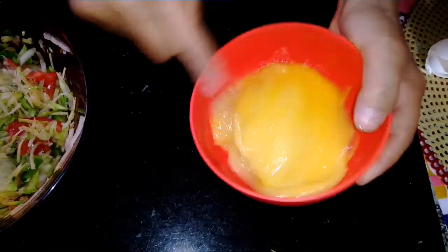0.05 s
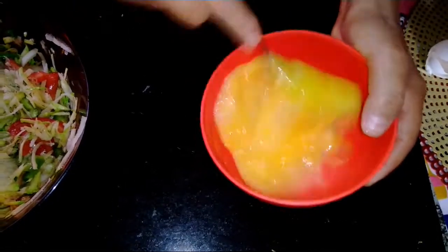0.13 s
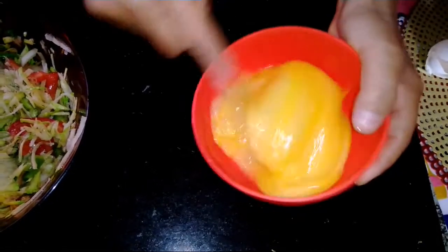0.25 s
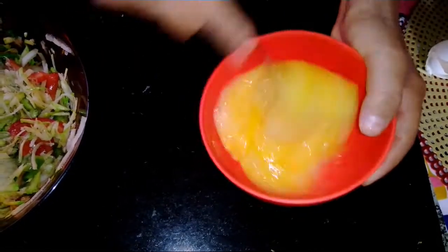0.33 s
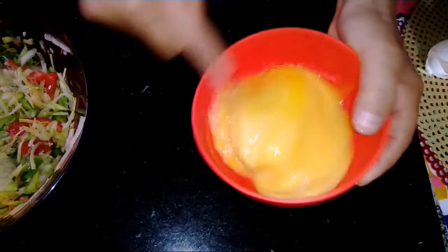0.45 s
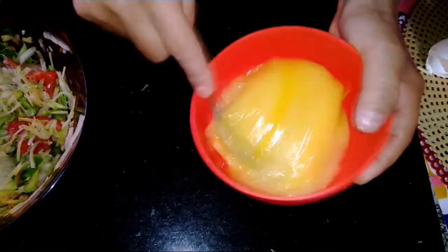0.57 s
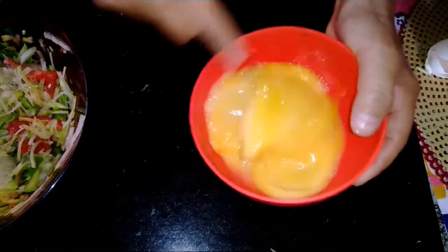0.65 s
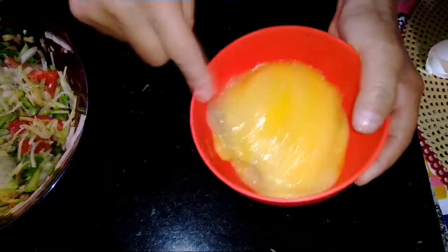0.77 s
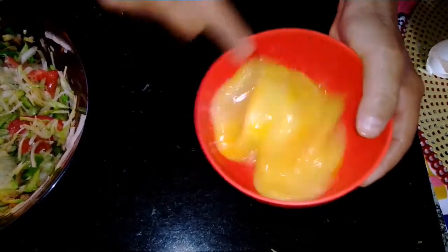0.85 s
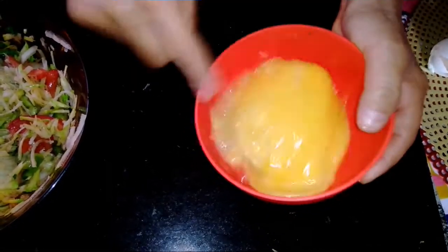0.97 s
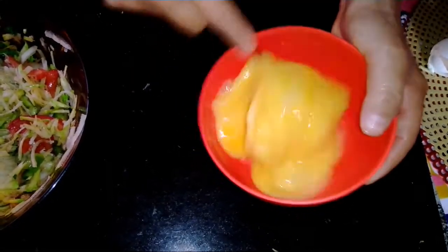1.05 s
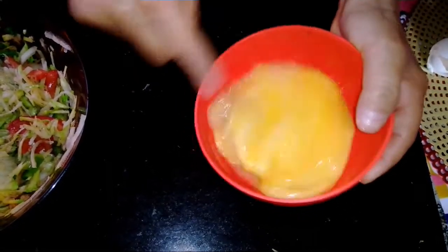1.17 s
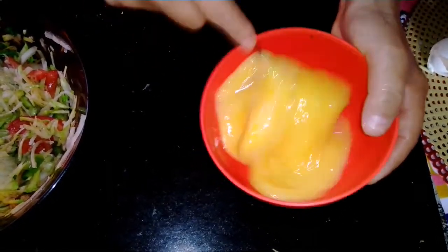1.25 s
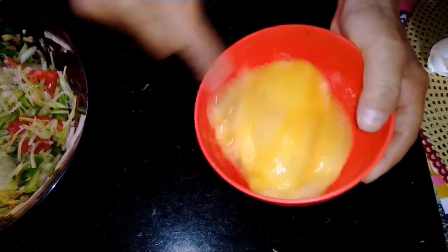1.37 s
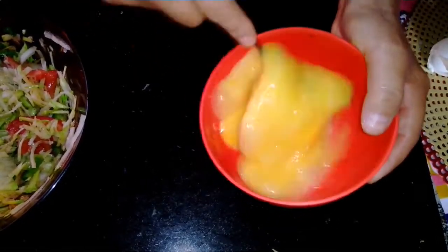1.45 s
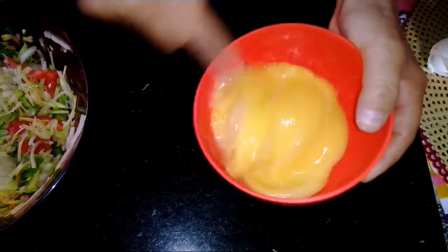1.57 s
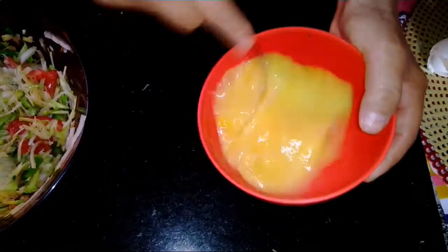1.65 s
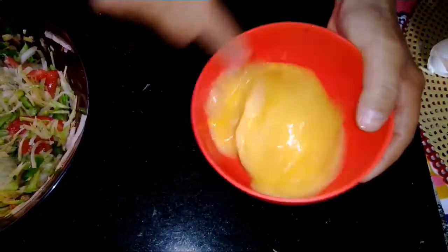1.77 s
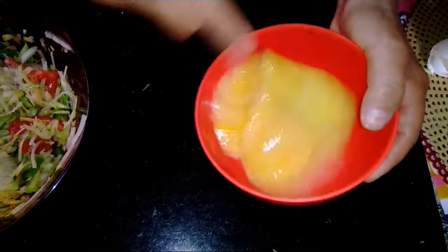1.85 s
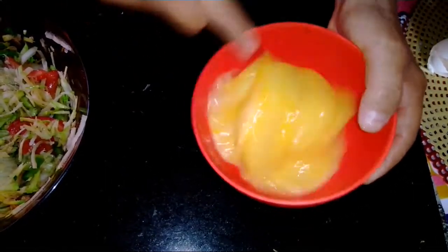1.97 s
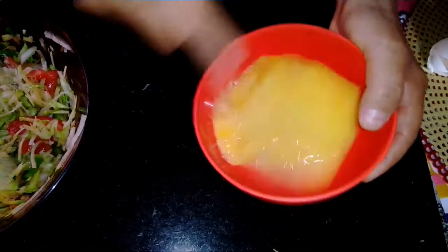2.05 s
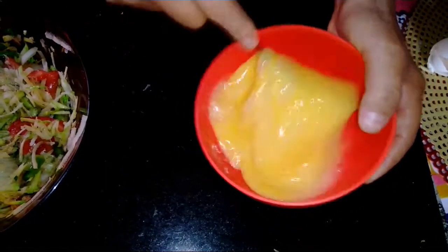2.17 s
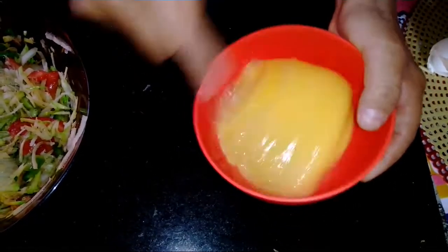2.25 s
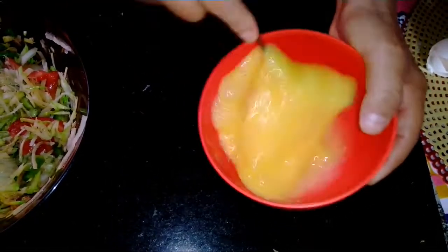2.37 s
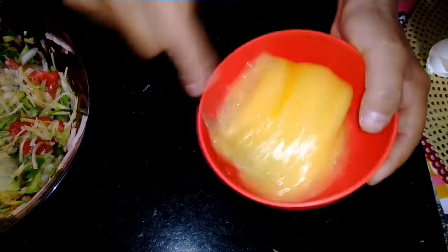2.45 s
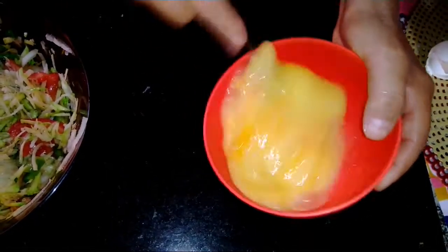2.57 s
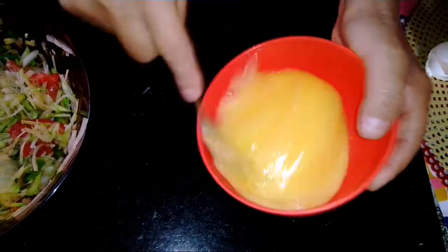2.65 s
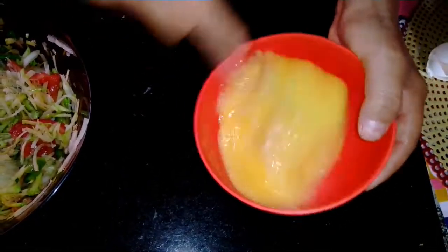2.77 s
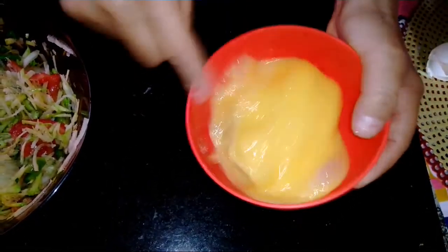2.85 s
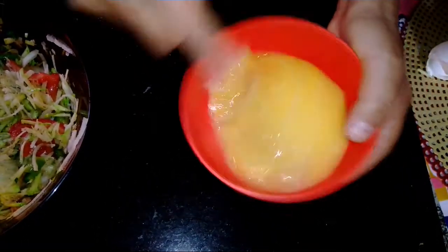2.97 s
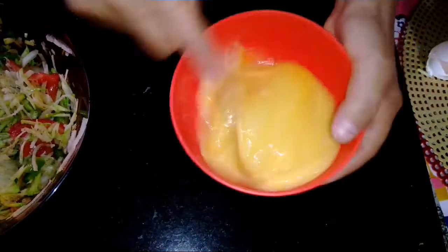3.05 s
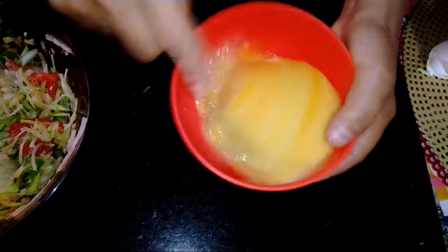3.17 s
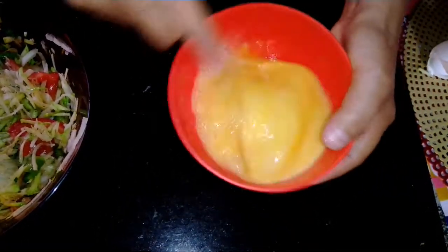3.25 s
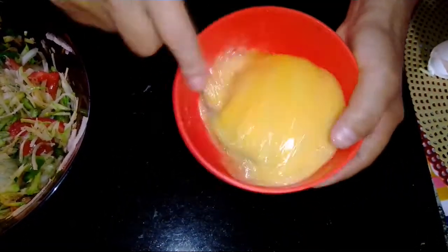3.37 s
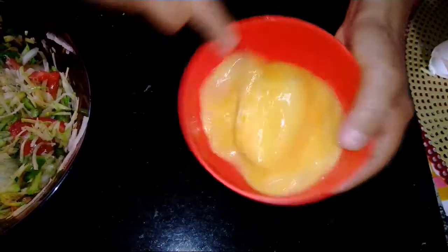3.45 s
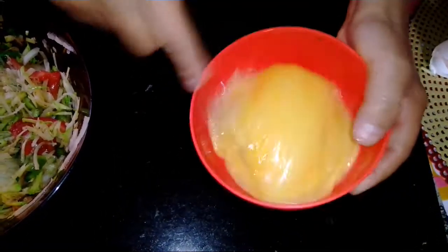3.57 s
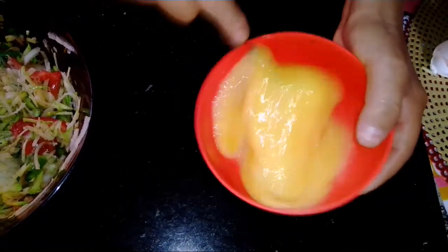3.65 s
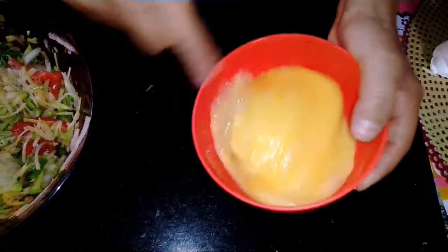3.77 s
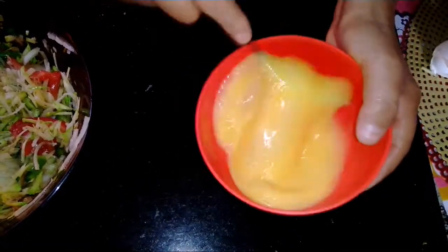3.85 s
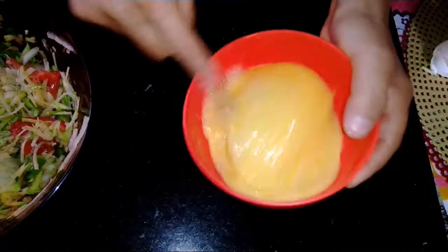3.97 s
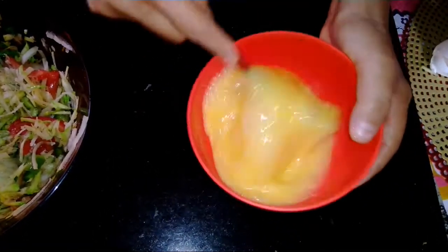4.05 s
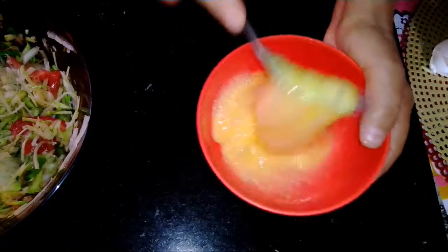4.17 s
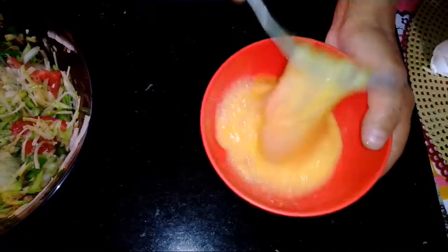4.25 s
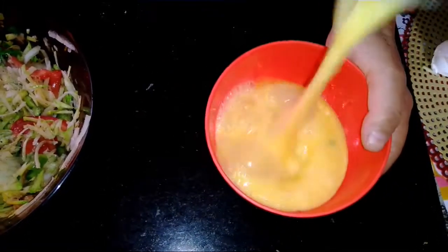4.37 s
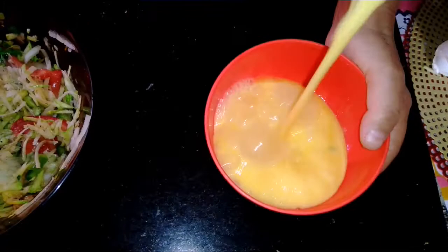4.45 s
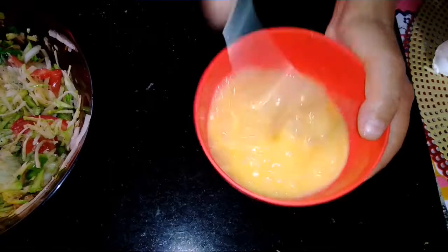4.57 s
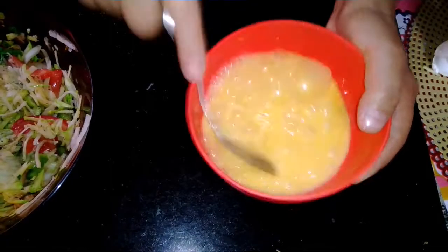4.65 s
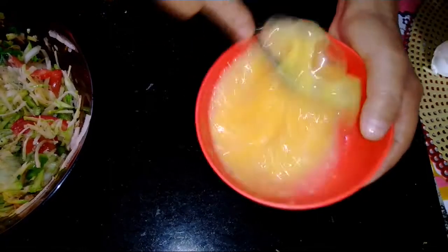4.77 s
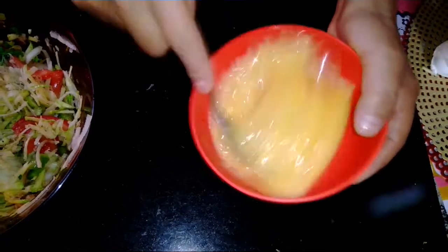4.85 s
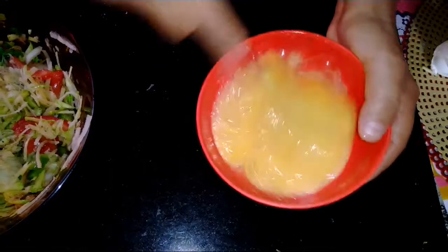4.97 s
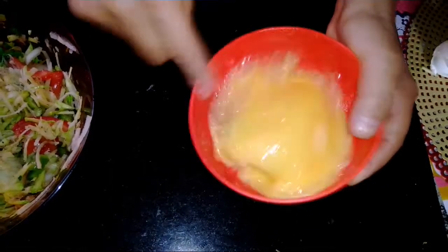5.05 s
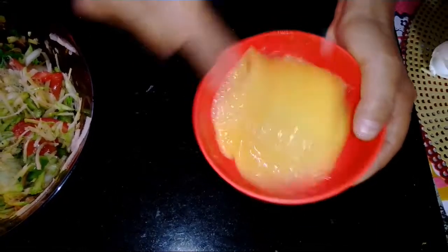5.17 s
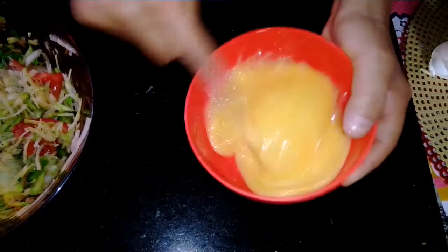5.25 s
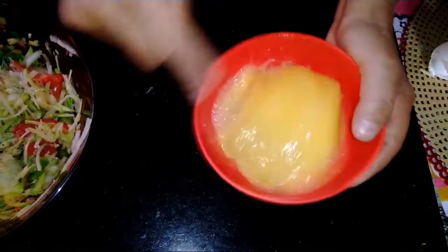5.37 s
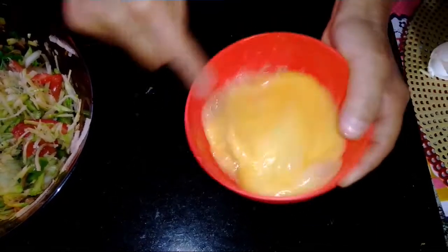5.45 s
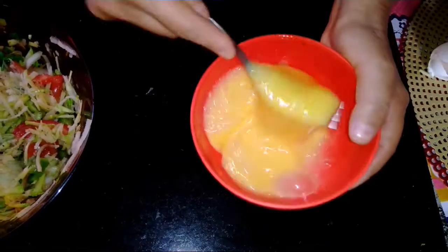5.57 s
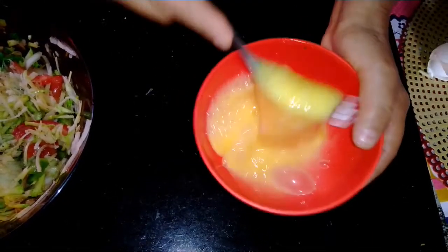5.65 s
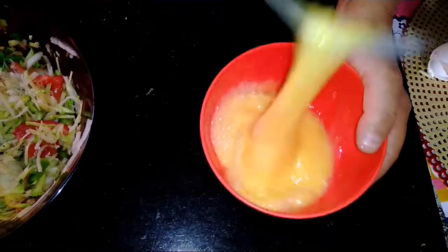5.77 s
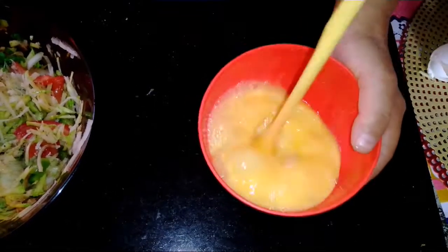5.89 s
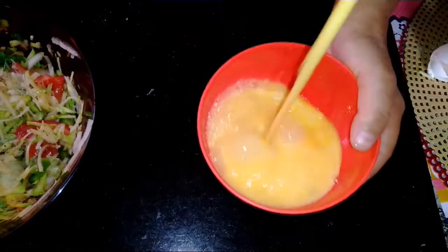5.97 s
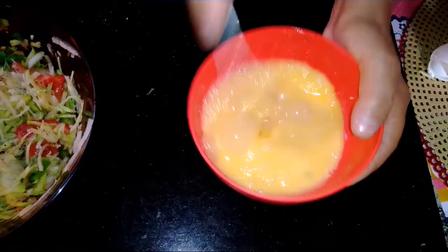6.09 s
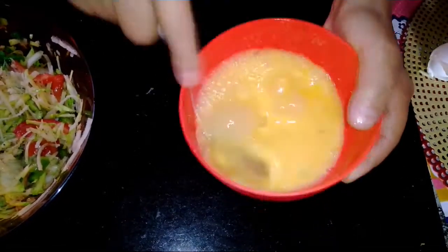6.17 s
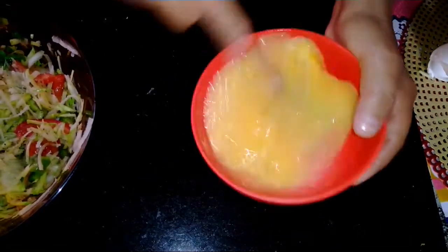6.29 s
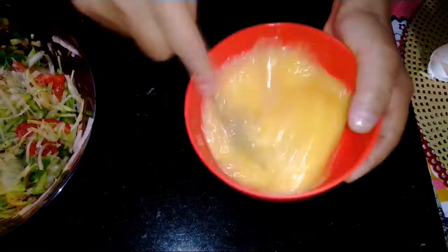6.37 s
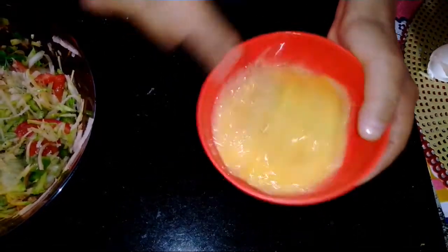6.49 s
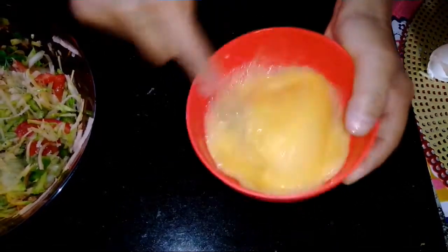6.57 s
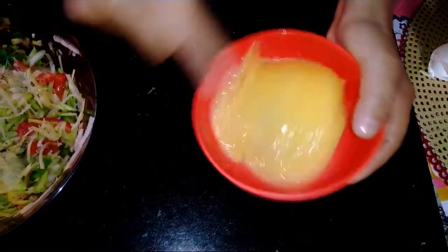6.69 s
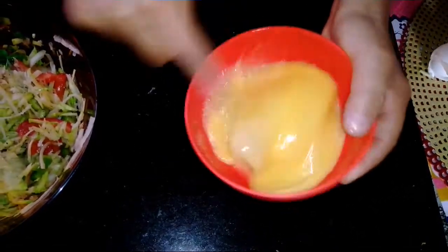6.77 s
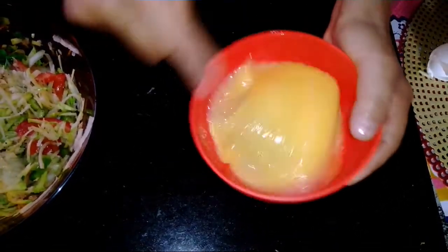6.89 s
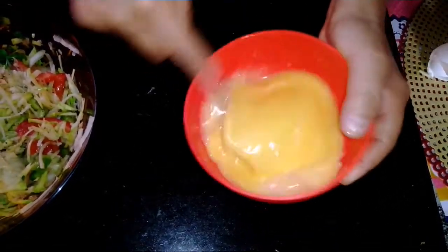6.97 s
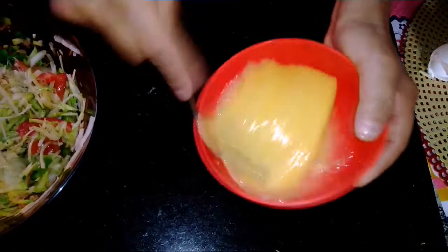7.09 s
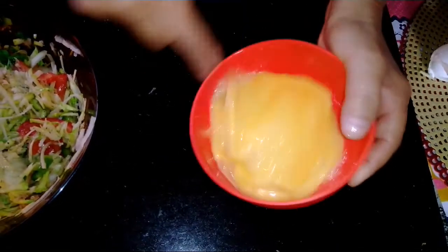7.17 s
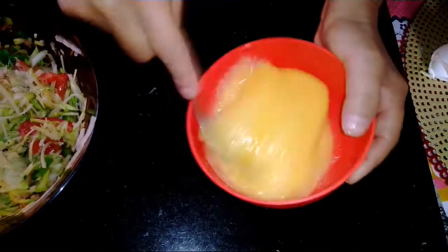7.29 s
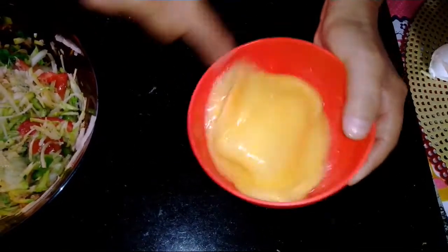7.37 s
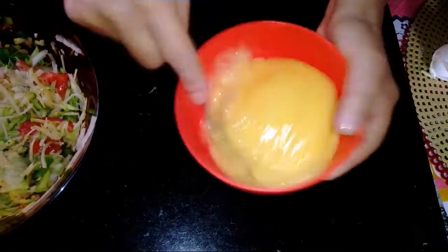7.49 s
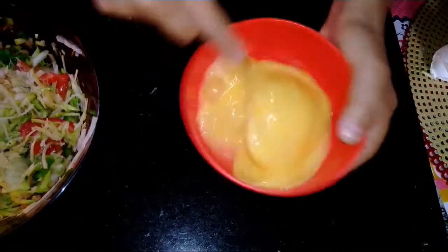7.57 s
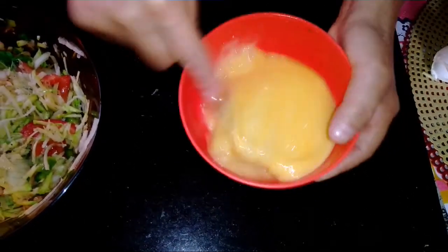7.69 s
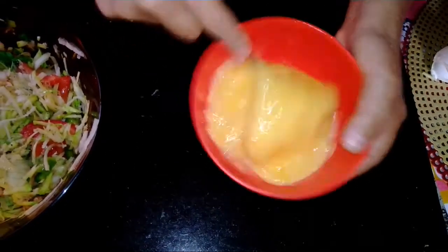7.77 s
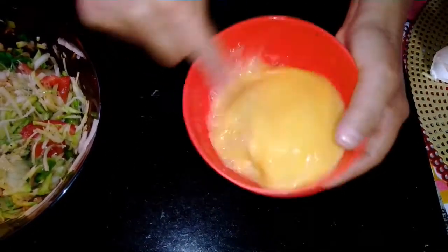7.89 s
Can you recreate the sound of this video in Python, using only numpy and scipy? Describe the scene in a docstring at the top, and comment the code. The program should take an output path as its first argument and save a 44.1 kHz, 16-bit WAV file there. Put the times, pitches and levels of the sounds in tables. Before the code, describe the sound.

Close to the microphone in a small kitchen, raw eggs are whisked with a metal fork in a plastic bowl. Quick, even knocks and clicks mix with sloshing, squelching and tiny bubbles. Just past halfway the rhythm stops for a moment as egg trickles softly off the fork, restarts briefly, then stops again for a few faint drips. The brisk beating then carries on, with a short room echo behind it.

```python
"""A small kitchen, one microphone close to a hand-held plastic bowl, mono. A steel fork is already beating
raw eggs, a little over five strokes a second: each knocks the wall, then drags through the egg with a wet
swish and small bubbles. Just after 4 s the fork lifts and egg dribbles back into the bowl. Five more
strokes, then a second lift near 5.6 s, with drips and a faint hum from the free tines. From 6.2 s the
beating runs on to the end. A short room tail sits behind it all."""
import sys
import numpy as np
from scipy import signal
from scipy.fft import rfft, irfft, next_fast_len
from scipy.io import wavfile
from scipy.ndimage import uniform_filter1d

SR = 44100
rng = np.random.default_rng(int(sys.argv[2]) if len(sys.argv) > 2 else 0)


def wav_out(sig):
    """Save sig, one row per channel (or a flat mono array), as 16-bit PCM at SR to the path in sys.argv[1]."""
    wavfile.write(sys.argv[1], SR, np.round(np.clip(np.atleast_2d(sig).T, -1, 1) * 32767).astype(np.int16))


N = 349713
SIZE = 16384  # samples in one short event
T = np.arange(SIZE) / SR
HZ = np.fft.rfftfreq(SIZE, 1 / SR)

# beats of the fork, knock then drag: (t/s, force/dB, hardness/dB, depth in the bowl/dB, drag length/s)
BEATS = [(-0.098, -35, 0, 0, .1), (0.087, -23.5, -1.5, -5.5, .1), (0.2781, -23.5, -3, -3.5, 0.1),
         (0.465, -25, -1.5, 1, 0.11), (0.6449, -29.5, -3, -1.5, 0.098), (0.839, -28.5, -3.5, -2, 0.1),
         (1.0305, -32, -1.5, 4.5, 0.096), (1.2153, -26.5, 0, 3, .11), (1.404, -41, 1, 5, 0.11),
         (1.591, -31, -2, 6, 0.1), (1.782, -33.5, 1.5, -2, 0.1), (1.967, -34, 0.5, -3.5, 0.11),
         (2.157, -30.5, 0, -0.5, 0.098), (2.339, -30, 3, 5, .11), (2.53, -30, 5, 3, 0.066),
         (2.7054, -28.5, 6, -4, 0.11), (2.899, -29, -5, 1.5, 0.091), (3.0775, -30.5, -9, -3, 0.083),
         (3.2467, -32, 0, -3, 0.097), (3.4545, -31.5, -7.5, -1.5, 0.078), (3.6325, -33, -1, -2, 0.089),
         (3.825, -32.5, -5, -0.5, 0.078), (4.0027, -26, 0, -0.5, .055), (4.7246, -34.5, -2, -3, 0.091),
         (4.928, -28, -0.5, -1.5, .061), (5.0978, -28.5, 2.5, -1, 0.09), (5.2833, -25, -1, -1, .09),
         (5.467, -25, -3.5, -0.5, .085), (6.241, -34.5, -5, -1, 0.11), (6.4471, -29.5, 5.5, -0.5, 0.067),
         (6.6178, -29, 1, 0.5, 0.1), (6.811, -29, 0, 0.5, 0.1), (6.999, -35.5, 3.5, 9.5, .11),
         (7.186, -26, 1, -1, 0.12), (7.3978, -41.5, 4.5, 13, 0.088), (7.572, -27, -0.5, 2.5, 0.095),
         (7.7498, -34.5, -3.5, 6, 0.11)]
# vigour of the drag through the egg: (t/s, level/dB)
DRAG_VIGOUR = [(0, 0), (2.34, 1), (2.7, -4.5), (2.9, .5), (3.82, 3), (4.0, -1.5), (4.72, 4.5), (5.28, 1),
               (5.47, -1), (6.24, 0), (6.8, -2.5), (7.4, -1.5), (7.8, -3.5)]
# beating resumes after each lift: (t/s)
RESTARTS = [4.72, 6.24]
# resonances as the tines plough the egg, rub the floor and leave by the wall: (f/Hz, width/Hz, level/dB)
SLOSH_MODES = [(360, 64, -10), (458, 95, -6.5), (690, 220, -3.5), (804, 380, -5), (1063, 91, 2.5),
               (1310, 200, -3), (1816, 95, -1.5), (2367, 62, -5), (3000, 250, -15.5)]
HISS_MODES = [(4150, 1500, -9), (6360, 980, 0), (7600, 1900, -6), (7800, 850, -15), (9140, 600, -4),
              (11230, 740, -5), (12200, 700, -17)]
RASP_MODES = [(1830, 220, -2), (2179, 85, 6.5), (2950, 220, -5), (3390, 250, -4), (4410, 440, -7.5),
              (6450, 1100, -15), (8370, 700, -10.5), (10250, 730, -9.5)]
# envelopes of those three parts: (time/drag length, level/dB)
SLOSH_ENVELOPE = [(0, -9.5), (0.101, 0), (0.499, 0.5), (.8, 0), (1, -17.5), (1.15, -21.5), (1.6, -29.5)]
HISS_ENVELOPE = [(0, 1.5), (.2, -12), (.45, -0.5), (0.619, 1), (0.801, -13), (1, -34.5), (1.15, -28),
                 (1.6, -61)]
RASP_ENVELOPE = [(0, 3), (.4, -10.5), (.65, -6), (.87, 5), (1, 1.5), (1.12, -14.5), (1.6, -46)]
# the filled bowl with the fork against it: (f/Hz, width/Hz, level/dB)
BOWL_MODES = [(352.8, 32.7, 4), (412, 60, -8), (477, 24, -8), (608, 46, -17.5), (977, 130, -4.5),
              (1130, 240, -4.5), (1216, 140, -6.5), (1740, 88, -3), (2255, 75, -4.5), (2700, 386, -11),
              (3160, 350, -14), (3980, 890, -20.5), (5190, 560, -16.5), (6930, 1300, -11),
              (8450, 2100, -10.5), (9690, 950, -9), (10940, 210, -9), (10850, 180, -13.5)]
# the bowl's thud, body, clack and click bands: (low f/Hz, high f/Hz)
BANDS = [(280, 650), (650, 1500), (1500, 4500), (4500, 15000)]
# one value for each of those bands:
BAND_DB = [-7.5, -5.5, 0, 0]  # (level/dB) over the force
HARDNESS_TILT = [-0.78, -.8, 0.17, 1]  # (dB/dB of hardness) bare steel clicks, a blow through egg thuds
DEPTH_TILT = [1, -1, 0, 0]  # (dB/dB of depth) the floor thuds, the wall higher up rings
SETTLED_SHIFT = [-26.5, 7, -7, 5.5]  # (level/dB) change while the egg lies settled
# the fork glances off the wall between beats: (t/s, force/dB, hardness/dB)
WALL_GLANCES = [(0.0293, -52, -14), (0.2151, -53, -2), (0.591, -54.5, 8), (0.6117, -56, 10.5),
                (0.7677, -45, 1.5), (0.97, -36, -5), (1.177, -34.5, 1), (1.556, -54.5, -2),
                (1.929, -39, -5), (2.025, -46, -13), (2.336, -45, 12), (2.4595, -48, -5),
                (2.7435, -41.5, -17), (2.8015, -40, 6), (3.0351, -51, 9), (3.06, -42, -6.5),
                (3.2636, -32, -11), (3.654, -36.5, 0.5), (3.841, -36.5, -2), (4.055, -44, -9.5),
                (4.8118, -49.5, 7.5), (4.857, -55, -2), (5.117, -43, -0.5), (5.4261, -68, 16),
                (5.4408, -50.5, 7), (5.4527, -63, 12), (5.531, -41, 1), (6.436, -54, 10), (6.9326, -43, -7),
                (7.0055, -34.5, 1), (7.2079, -37, -10), (7.2245, -46, 8.5), (7.3843, -45, -5.5),
                (7.7581, -36.5, -11.5)]
# the hand's grip frees or damps the bowl's lowest mode: (t/s, level/dB)
HAND_GRIP = [(0, 5), (3.5, 4.5), (4.1, -1), (5.2, -3.5), (6.5, -8.5), (7.9, -13)]
# the largest pockets of air closing behind the tines: (t/s, f/Hz, level/dB)
AIR_POCKETS = [(0.129, 477, -31.5), (0.537, 542, -29.5), (0.559, 3260, -33), (0.704, 1070, -31),
               (1.082, 1350, -30.5), (1.274, 980, -30), (1.461, 1006, -29), (2.236, 2297, -34),
               (2.972, 2220, -36), (3.893, 3210, -29), (3.905, 2320, -29.5), (4.729, 986, -22),
               (4.772, 960, -33), (4.953, 638, -26.5), (6.243, 1035, -28), (7.097, 3320, -32)]
# the bare wall above the egg: (f/Hz, width/Hz, level/dB)
WALL_MODES = [(3700, 260, -2.5), (4410, 600, 2.0), (5480, 730, 3.0), (6320, 850, 2)]
# egg running off the lifted fork: (t/s, level/dB)
STRAND_FLOW = [(4.1, -71.5), (4.28, -78), (4.4, -100), (4.45, -88), (4.48, -67.5), (4.6, -71), (4.7, -95),
               (5.6, -69.5), (5.82, -100), (5.88, -88), (5.98, -87), (6.03, -67.5), (6.1, -74),
               (6.2, -99.5)]
# colour of the running egg: (f/Hz, width/Hz, level/dB)
STRAND_MODES = [(740, 78, -4), (1100, 430, 0), (1770, 390, 7.5), (2240, 630, -5.5), (3090, 500, -13.5),
                (7600, 900, -15), (9200, 900, -11.5)]
# bubbles bursting as the running egg settles: (t/s, f/Hz, level/dB)
BURSTS = [(4.259, 2550, -56.5), (4.458, 7440, -49), (4.519, 2010, -59), (5.766, 8040, -66.5),
          (5.82, 2920, -66)]
# drops falling off the lifted fork: (t/s, force/dB, hardness/dB)
DROPS = [(4.46, -66.5, -11), (4.564, -69, -4), (4.607, -54, 6), (4.677, -82, 19), (5.608, -57, 4.5),
         (5.646, -59.5, 2.5), (5.922, -83, 14.5), (5.993, -81, 14), (6.008, -70.5, -8), (6.02, -67.5, 5),
         (6.035, -54, -9)]
# the kitchen's decay: (f/Hz, t60/s)
ROOM_DECAY = [(150, .4), (400, 0.42), (2000, 0.29), (8000, 0.22), (14000, 0.22)]
# spectrum of the noise floor: (f/Hz, level/dB)
NOISE_FLOOR = [(25, -8), (90, -1.5), (250, -12.5), (600, -19), (2000, -17.5), (9000, -25.5), (16000, -55)]
# response of the close microphone: (f/Hz, level/dB)
MIC_RESPONSE = [(30, -3.5), (120, 4.5), (220, 4), (350, -2.5), (700, -1), (1500, -2.5), (3000, 0.5),
                (5000, -1.5), (8000, 1.5), (11000, -1), (12500, 2), (15000, -0.5), (16500, -23)]

SLOSH_DB, HISS_DB, RASP_DB = -45, -42, -45.5  # the three parts of a drag
STIR_S, SETTLED_SLOSH_DB = 0.15, -9.5  # rested egg takes a moment to get moving and hardly sloshes
DRAG_LEAD_S = .0005  # the drag begins just before the knock
GRIP_SHARE = .45  # share of the grip's effect that reaches the whole thud
BEAT_GRIT_DB, GLANCE_GRIT_DB = -19.5, -13  # grating of the tips: a beat lands squarely, a glance skids
MIC_LIMIT_HZ = 16700


def amp(db):
    """Decibels to gain."""
    return 10 ** (np.asarray(db) / 20)


def unit(x):
    """x at rms 1."""
    return x / np.sqrt(np.mean(x ** 2) + 1e-20)


def at_time(rows, s):
    """A (t/s, value) curve read at time s."""
    return np.interp(s, *np.transpose(rows))


def at_hz(rows, hz):
    """A (f/Hz, value) curve read on a log axis."""
    freqs, values = np.transpose(rows)
    return np.interp(np.log(hz + 1), np.log(freqs + 1), values)


def wander(length, span):
    """Noise smoothed over span samples, at rms 1."""
    return unit(uniform_filter1d(rng.standard_normal(length), size=span))


def filtered(x, response):
    """x through a frequency response."""
    size = next_fast_len(N + SR // 2)
    return irfft(rfft(x, size) * response(np.fft.rfftfreq(size, 1 / SR)), size)[:N]


def add(track, s, sound):
    """Mix a sound into the track at s seconds."""
    start = round(s * SR)
    sound = sound[max(-start, 0):]
    part = track[max(start, 0):][:len(sound)]
    part += sound[:len(part)]


def resonate(push, modes, detune, scatter_db):
    """Ring the modes; the moving egg loads them differently every time."""
    response = 0
    for k, (hz, width, db) in enumerate(modes):
        hz = hz * np.exp(detune * rng.normal())
        gain = (-1) ** k * amp(db + scatter_db * rng.normal())
        response = response + gain * 1j * HZ * width / (hz ** 2 - HZ ** 2 + 1j * HZ * width)
    fade = np.minimum(1, 2 - 2 * T / T[-1]) ** 2
    return irfft(rfft(push) * response, SIZE) * fade


def grains(rate, smooth):
    """Tiny bursts of film and slips of steel, rate a second, over a smooth rush."""
    pops = (rng.random(SIZE) < rate / SR) * rng.standard_normal(SIZE)
    return unit(unit(pops) + smooth * rng.standard_normal(SIZE))


def settled(s):
    """How still the egg lies: 1 on the first stroke after a rest, falling to 0 as it is stirred."""
    return sum(np.exp(-((s - start) / STIR_S) ** 2) for start in RESTARTS if s >= start)


def drags():
    """Each beat's drag through the egg: (t/s, length/s, slosh/dB, hiss/dB, rasp/dB)."""
    for s, *_, length in BEATS:
        vigour_db = at_time(DRAG_VIGOUR, s)
        slosh_db = vigour_db + SLOSH_DB + SETTLED_SLOSH_DB * settled(s)
        yield s - DRAG_LEAD_S, length + DRAG_LEAD_S, slosh_db, vigour_db + HISS_DB, vigour_db + RASP_DB


def rub(length, modes, envelope, rate, flutter_db):
    """One part of a drag: dense grains through resonances that shift as the tines travel."""
    flutter = flutter_db * wander(SIZE, span=700)
    share, db = np.transpose(envelope)
    level = amp(np.interp(T / length, share, db, right=-120) + flutter)
    early = unit(resonate(grains(rate, smooth=0.94), modes, detune=0.034, scatter_db=2))
    late = unit(resonate(grains(rate, smooth=0.94), modes, detune=0.034, scatter_db=2))
    travel = np.pi * T / length
    return level * (np.cos(travel) * early + np.sin(travel) * late)


def swishes():
    """The tines plough the egg, hiss along the bowl's floor, then rasp up the wall."""
    out = np.zeros(N)
    for s, length, slosh_db, hiss_db, rasp_db in drags():
        add(out, s, amp(slosh_db) * rub(length, SLOSH_MODES, SLOSH_ENVELOPE, rate=700, flutter_db=4.0))
        add(out, s, amp(hiss_db) * rub(length, HISS_MODES, HISS_ENVELOPE, rate=5800, flutter_db=2.0))
        add(out, s, amp(rasp_db) * rub(length, RASP_MODES, RASP_ENVELOPE, rate=2300, flutter_db=3.55))
    return out


def bubble(hz, t60, glide, rough):
    """An air pocket in thick egg: it swells softly, wavers, slides in pitch and is quickly damped."""
    age = T[:SIZE // 8] / t60
    waver = rough * wander(len(age), span=60)
    pitch = hz * (1 + glide * (np.minimum(age, 1) - .2) + waver)
    swell = age * amp(-60 * age)
    return swell / swell.max() * np.sin(2 * np.pi * np.cumsum(pitch) / SR)


def bubbles(low_hz, high_hz, bubble_db, count):
    """Air folded into the egg: a few small bubbles per stroke."""
    out = np.zeros(N)
    for s, length, slosh_db, _, _ in drags():
        for when, pitch, faintness in rng.random((count, 3)):
            hz = low_hz * (high_hz / low_hz) ** pitch
            gain = amp(slosh_db + bubble_db - 10 * faintness - 4.9 * when)
            add(out, s + 1.3 * when * length, gain * bubble(hz, t60=0.0079, glide=0.078, rough=0.15))
    return out


def crackle(crackle_db, count):
    """Thin films of egg snap on the tines all through a stroke."""
    out = np.zeros(N)
    for s, length, _, hiss_db, _ in drags():
        snaps = np.zeros(SIZE)
        strengths = amp(rng.normal(0, 3.5, count))
        snaps[(rng.uniform(.1, 1.45, count) * length * SR).astype(int)] = strengths
        add(out, s, amp(hiss_db + crackle_db) * resonate(snaps, HISS_MODES, detune=.06, scatter_db=6.5))
    return out


def squelches(first_hz, last_hz, squelch_db, count):
    """As the tines leave, the hollow behind them widens and its rough ring steps down in pitch."""
    out = np.zeros(N)
    for s, length, _, _, rasp_db in drags():
        for opening, faintness in rng.random((count, 2)):
            hz = first_hz * (last_hz / first_hz) ** opening
            ring = bubble(hz, t60=.018, glide=-.03, rough=.08)
            gain = amp(rasp_db + squelch_db - 4.2 * faintness)
            add(out, s + length * (0.83 + 0.22 * opening), gain * ring)
    return out


def impact(spread_s, later_db, grit_db, grit_t60):
    """One tine or fleck of egg lands, three more follow, with a brief grating."""
    push = amp(grit_db - 60 * T / grit_t60) * rng.standard_normal(SIZE)
    push[0] += 1
    followers = (rng.uniform(.1, 1, size=3) * spread_s * SR).astype(int)
    push[followers] += amp(later_db + rng.normal(0, 8.9, size=3))
    return push


def bowl_ring(push, levels, bands, grip_db=0):
    """The bowl's answer to a short push, each band at its level over a hundredth of a second."""
    out, modes = np.zeros(SIZE), np.array(BOWL_MODES, float)
    modes[0, 2] += grip_db
    for db, (low, high) in zip(levels, bands):
        ring = resonate(push, [m for m in modes if low <= m[0] < high], detune=0.043, scatter_db=5.5)
        # a small bowl radiates little below its modes
        ring = signal.sosfilt(signal.butter(3, low, "highpass", fs=SR, output="sos"), ring)
        out += amp(db) * ring / np.linalg.norm(ring) * np.sqrt(SR / 100)
    return out


def spatter(band_db, count):
    """Flung egg lands back in the bowl while the fork swings round."""
    out = np.zeros(N)
    for s, length, *_ in drags():
        for wait, size in zip(rng.uniform(0.0067, 0.04, count), rng.uniform(-0.65, 1, count)):
            push = impact(spread_s=0.0012, later_db=-1.5, grit_db=-21.0, grit_t60=0.0088)
            add(out, s + length + wait, bowl_ring(push, np.add(band_db, 9 * size), BANDS))
    return out


def contact_levels(force_db, hardness_db):
    """Thud, body, clack and click of one contact, in dB."""
    return force_db + np.array(BAND_DB) + hardness_db * np.array(HARDNESS_TILT)


def knocks(bump_db, bump_hz, bump_t60):
    """Every contact of fork and bowl; the harder ones also shove the whole bowl against the hand."""
    out = np.zeros(N)
    bump = np.sin(2 * np.pi * bump_hz * T) * amp(-60 * T / bump_t60)
    contacts = [(*row[:4], BEAT_GRIT_DB) for row in BEATS]
    contacts += [(*row, 0, GLANCE_GRIT_DB) for row in WALL_GLANCES]
    for s, force_db, hardness_db, depth_db, grit_db in contacts:
        grip_db = at_time(HAND_GRIP, s)
        levels = contact_levels(force_db, hardness_db) + depth_db * np.array(DEPTH_TILT)
        levels += settled(s) * np.array(SETTLED_SHIFT)
        levels[0] += GRIP_SHARE * grip_db
        push = impact(spread_s=.0028, later_db=-4.5, grit_db=grit_db, grit_t60=0.03)
        add(out, s, bowl_ring(push, levels, BANDS, grip_db))
        add(out, s, amp((levels[0] + force_db) / 2 + bump_db) * bump)
    return out


def plunges(lead_s, rise_t60, plunge_db):
    """Just before each beat's knock the tines cut into the egg."""
    out = np.zeros(N)
    envelope = amp(plunge_db - 60 * np.abs(T - lead_s) / rise_t60)
    for s, _, slosh_db, hiss_db, _ in drags():
        slosh = unit(resonate(grains(1500, smooth=0.64), SLOSH_MODES, detune=0.14, scatter_db=-7.5))
        hiss = unit(resonate(grains(650, smooth=0.13), HISS_MODES, detune=0.12, scatter_db=1))
        add(out, s - lead_s, envelope * (amp(slosh_db) * slosh + amp(hiss_db - 4.5) * hiss))
    return out


def gulps():
    """Larger pockets of air ring as they close behind the tines."""
    out = np.zeros(N)
    for s, hz, db in AIR_POCKETS:
        add(out, s, amp(db) * bubble(hz, t60=0.021, glide=0.026, rough=0.058))
    return out


def wall_scrape(s, length, scrape_db):
    """Once the tines catch the bare wall above the egg and scrape it brightly."""
    envelope = np.sin(np.pi * np.minimum(T / length, 1)) ** 2
    scrape = unit(resonate(grains(2600, smooth=0.99), WALL_MODES, detune=0.023, scatter_db=4.0))
    out = np.zeros(N)
    add(out, s, amp(scrape_db) * envelope * scrape)
    return out


def dribble(rate, count):
    """Off the lifted fork, a thin strand of egg crackles softly as it folds into the bowl."""
    out = np.zeros(N)
    for s in np.linspace(STRAND_FLOW[0][0], STRAND_FLOW[-1][0], count):
        add(out, s, resonate(grains(rate, smooth=0.86), STRAND_MODES, detune=0.034, scatter_db=-10))
    return unit(out) * amp(at_time(STRAND_FLOW, np.arange(N) / SR) - 8)


def drips():
    """Strings of egg break and patter into the bowl with no thud, and small bubbles burst."""
    out = np.zeros(N)
    for s, force_db, hardness_db in DROPS:
        splat = rng.standard_normal(SIZE) * amp(-60 * T / 0.021)
        add(out, s, bowl_ring(splat, contact_levels(force_db, hardness_db)[1:], BANDS[1:]))
    for s, hz, db in BURSTS:
        add(out, s, amp(db) * bubble(hz, t60=0.017, glide=.03, rough=0.05))
    return out


def fork_ring(s, hz, t60, ring_db):
    """Free of the egg, the lifted fork hums faintly and unevenly."""
    t = np.arange(SR) / SR
    waver = 0.43 * wander(SR, span=900)
    envelope = amp(ring_db - 60 * t / t60) * (1 - np.exp(-t / 0.057))
    out = np.zeros(N)
    add(out, s, envelope * np.sin(2 * np.pi * hz * t + waver))
    return out


def kitchen(direct, delay_s, count):
    """The room's tail at the microphone, changing as hand and bowl move."""
    out = np.zeros(N)
    step = N // count + 1
    for start in range(0, N, step):
        hz, t, noise = signal.stft(rng.standard_normal(SR // 2), SR, nperseg=256)
        decay = amp(-60 * t / at_hz(ROOM_DECAY, hz)[:, None])
        _, tail = signal.istft(noise * decay, SR, nperseg=256)
        tail /= np.linalg.norm(tail)
        add(out, start / SR + delay_s, signal.fftconvolve(direct[start:start + step], tail))
    return out


def scene():
    """The bowl up close, the kitchen well behind it and a very quiet floor, alike in both channels."""
    bowl = knocks(bump_db=-17.5, bump_hz=95, bump_t60=.018)
    bowl += plunges(lead_s=.02, rise_t60=0.019, plunge_db=5.5) + swishes()
    bowl += gulps() + bubbles(low_hz=415, high_hz=2250, bubble_db=7.0, count=6)
    bowl += squelches(first_hz=4180, last_hz=2100, squelch_db=4.0, count=2)
    bowl += crackle(crackle_db=11.5, count=6) + wall_scrape(s=2.783, length=0.021, scrape_db=-29.5)
    bowl += spatter(band_db=[-65, -64.5, -63, -63], count=2)
    bowl += drips() + dribble(rate=120, count=14) + fork_ring(s=5.88, hz=676, t60=0.6, ring_db=-63)
    floor = amp(-90) * unit(filtered(rng.standard_normal(N), lambda hz: amp(at_hz(NOISE_FLOOR, hz))))
    mono = bowl + amp(-17.0) * kitchen(bowl, delay_s=.005, count=24) + floor
    return np.array([mono, mono])


def record(dry):
    """The close microphone: a little warm in the bass, falling away above 15 kHz to its band limit."""
    def response(hz):
        return amp(at_hz(MIC_RESPONSE, hz)) * (hz < MIC_LIMIT_HZ)
    return np.array([filtered(side, response) for side in dry])


dry = scene()
out = record(dry)
wav_out(out)
```